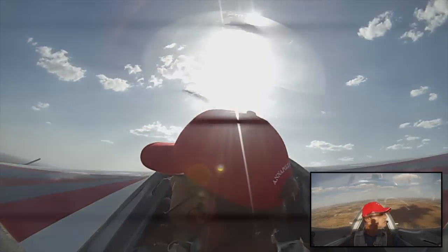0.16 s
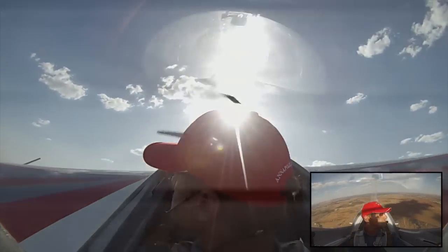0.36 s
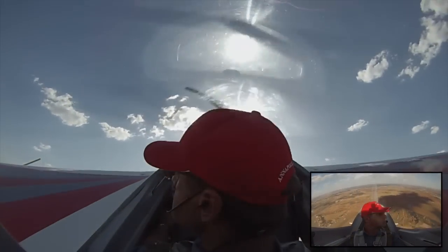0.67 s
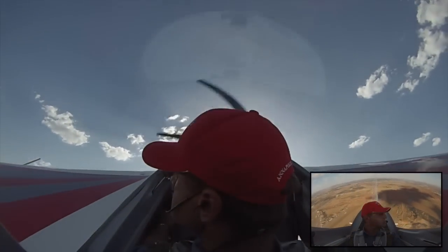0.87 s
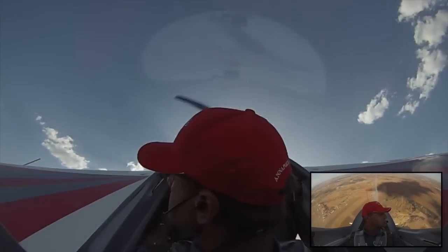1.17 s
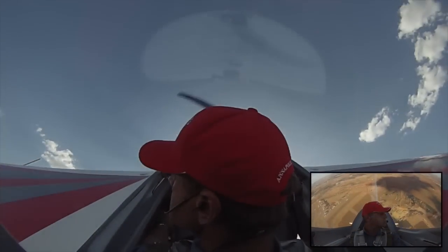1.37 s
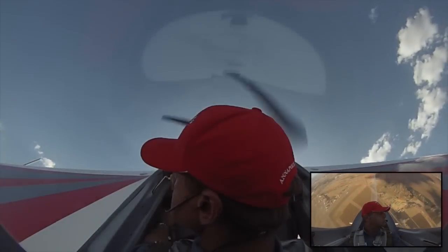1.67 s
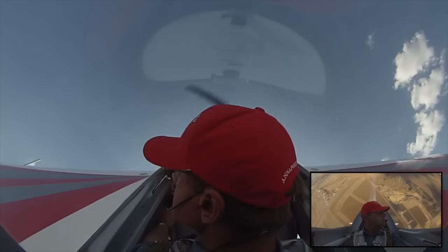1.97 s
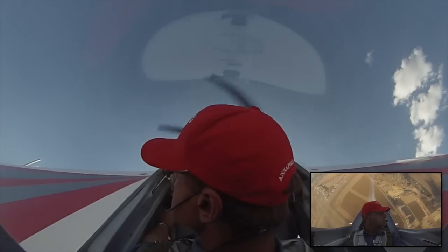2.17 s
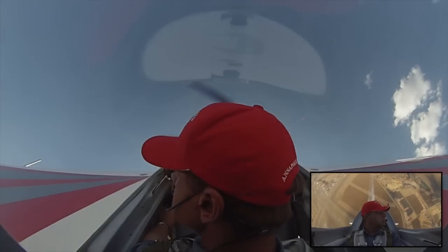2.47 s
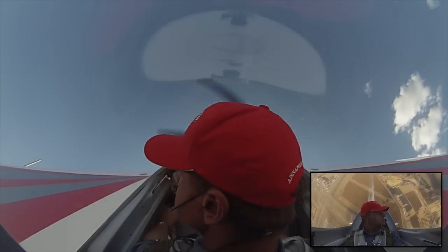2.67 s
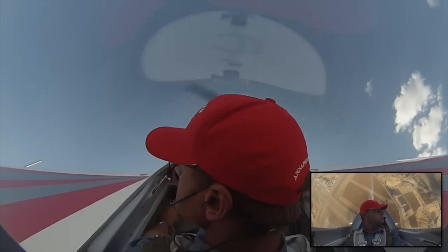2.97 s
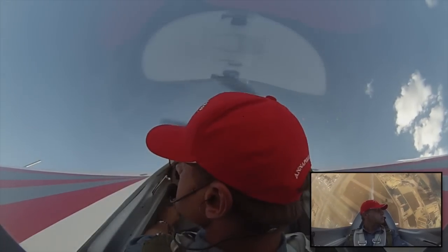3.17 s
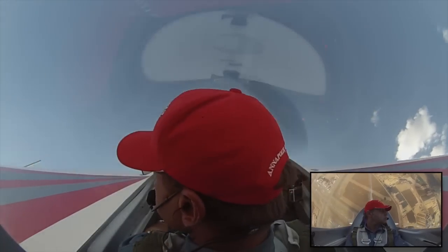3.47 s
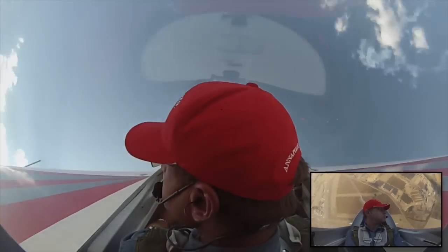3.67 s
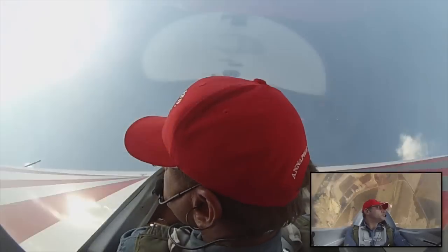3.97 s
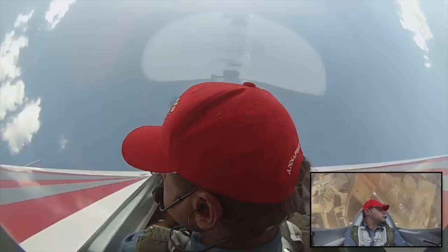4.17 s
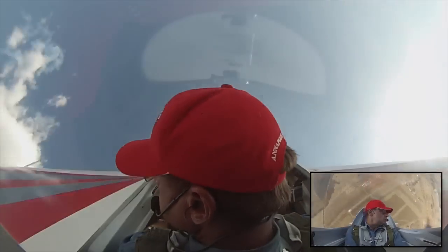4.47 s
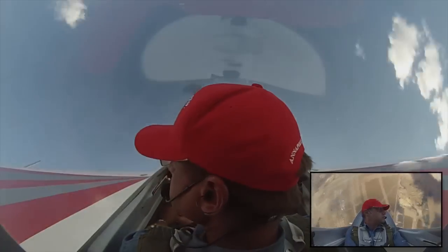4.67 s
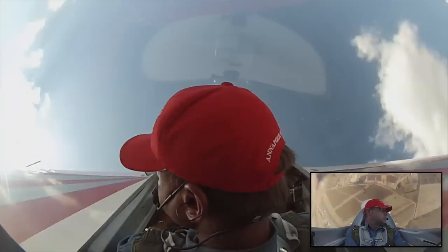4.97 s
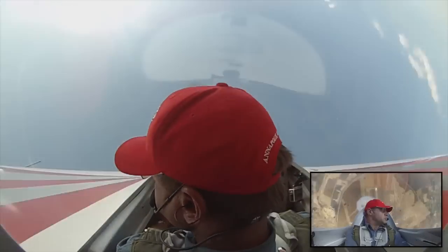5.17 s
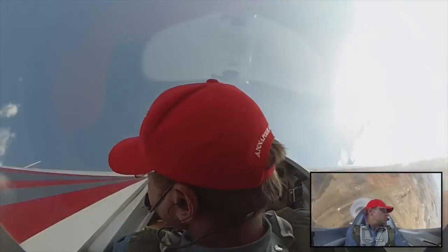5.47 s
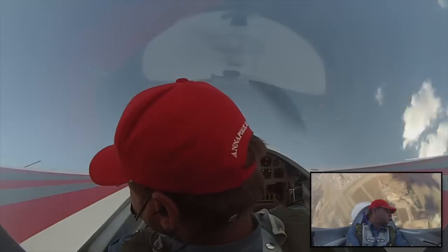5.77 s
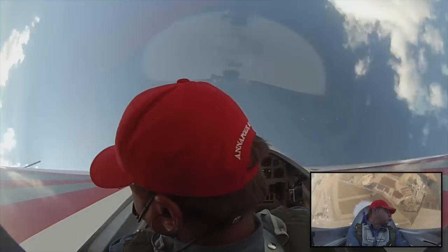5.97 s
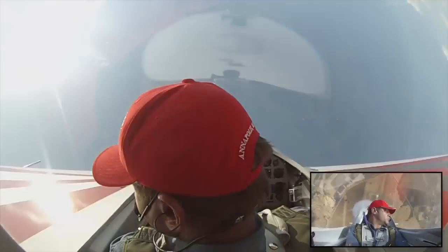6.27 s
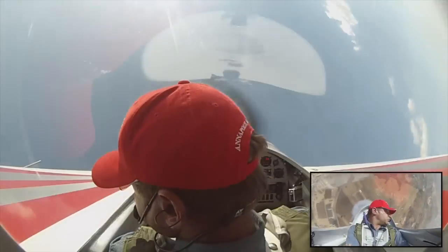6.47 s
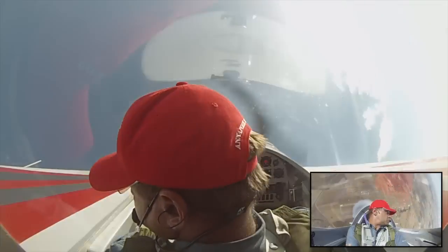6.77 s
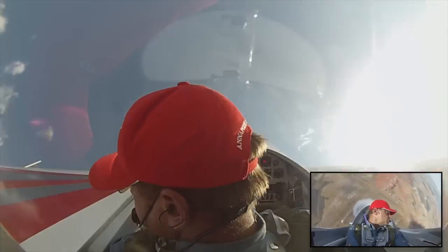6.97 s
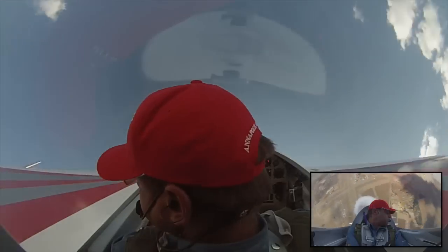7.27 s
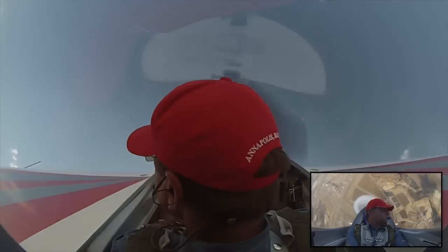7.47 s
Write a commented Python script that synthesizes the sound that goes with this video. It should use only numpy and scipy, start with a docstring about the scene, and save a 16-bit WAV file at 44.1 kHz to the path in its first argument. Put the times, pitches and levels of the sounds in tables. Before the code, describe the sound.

A small piston aircraft's engine and propeller drone steadily inside the cockpit, with low cabin boom, rushing slipstream, abrupt flickering dips and a faint buzzing rattle.

```python
"""Inside the cockpit of a small six-cylinder aircraft with a three-blade propeller, climbing and rolling.
Engine orders hum through the airframe as tones plus a slowly changing pressure pattern read once a cycle.
Slipstream over the canopy and the booming cabin air are coloured noise; a loose part buzzes and knocks
as noise bursts and single blows ringing resonances. Short dips interrupt all but the knocks.
The microphone sits in a closed housing that dulls the treble."""
import sys
import numpy as np
from scipy import signal
from scipy.fft import rfft, irfft, next_fast_len
from scipy.io import wavfile
from scipy.ndimage import map_coordinates

SR = 44100
rng = np.random.default_rng(int(sys.argv[2]) if len(sys.argv) > 2 else 0)


def wrap_up_sound(samples):
    """Save the sound to the file named by the first command line argument, as 16-bit audio."""
    columns = np.atleast_2d(samples).T
    # keep every value between -1 and 1, then stretch to whole-number steps
    tamed = np.clip(columns, -1, 1)
    steps = np.round(tamed * 32767).astype(np.int16)
    wavfile.write(sys.argv[1], SR, steps)


N = 335601

# Level of slipstream, engine, boom and buzz together, gusting as the aircraft turns; their own
# levels are relative to it (start_s, level_db)
STREAM_LEVEL = [(0, -26), (.24, -23), (.62, -25.5), (1.2, -25), (2.2, -25), (2.85, -24.5), (3.3, -26),
                (4.0, -27.5), (4.8, -25), (5.6, -27), (5.69, -25), (6.3, -28.5), (6.6, -27), (7.0, -29.5),
                (7.5, -28.5), (7.61, -27.5)]
# Abrupt drops of that same mix, each creeping back (start_s, depth_db, recovery_time_constant_s)
DIPS = [(.11, 3, 0.077), (.268, 2.5, .1), (1.023, 3, .12), (1.25, 3.5, .08), (1.278, 5.5, 0.078),
        (1.616, 3.5, 0.074), (1.775, 5.5, 0.04), (1.896, 3.5, 0.21), (2.05, 6, 0.092), (2.225, 4, .13),
        (2.335, 4.5, .1), (2.498, 5.5, 0.11), (2.619, 6, 0.084), (2.79, 3.5, 0.19), (3.098, 3.5, 0.15),
        (3.546, 4, 0.17), (3.672, 2, .06), (4.069, 1, 0.045), (4.212, 8, .17), (4.52, 2, .06),
        (4.63, 5, 0.097), (4.858, 6, 0.11), (5.103, 9, .12), (5.387, 5.5, .12), (5.506, 3.5, 0.098),
        (5.712, 4, 0.12), (5.912, 2.5, 0.21), (5.981, 3.5, 0.11), (6.166, 2, .1), (6.41, 1.5, 0.14),
        (6.66, 1.5, 0.13), (6.82, 4.5, 0.12), (6.965, 4, .13), (7.109, 2, .1), (7.2, 3, 0.11),
        (7.532, 3, .1)]
DROP_S = .004  # time constant of the fall

# Colour of the cabin boom (frequency_hz, density_db)
BOOM_COLOUR = [(15, -60.5), (30, -25), (45, -19.5), (60, -2.5), (80, 3.5), (100, -6), (120, -6.5),
               (150, -29), (250, -120)]
# Level of the cabin boom (start_s, level_db)
BOOM_LEVEL = [(0, 4), (1.5, 6.5), (2.1, 14.5), (3.4, 3), (4.2, 11), (4.7, 9), (5.3, 13), (5.8, 10.5),
              (7.2, 13.5), (7.6, 12.5)]

# Colour of the slipstream through canopy and housing, also of the engine pattern (frequency_hz, density_db)
CANOPY_COLOUR = [(220, -44.5), (380, -9), (397, -9), (497, 1.5), (593, -7.5), (672, -5), (775, -6),
                 (894, -18.5), (1050, -9), (1320, -7.5), (1730, -17), (2380, -10), (2490, -10),
                 (2700, -38.5), (3200, -46.5), (4160, -47.5), (7040, -120)]
# Colour of the low roar of the slipstream (frequency_hz, density_db)
ROAR_COLOUR = [(59, -33.5), (100, -2.5), (216, -9.5), (258, -14), (324, -11), (382, -29.5), (420, -30.5),
               (550, -57), (920, -120)]
# Colour of the slipstream hiss (frequency_hz, density_db)
HISS_COLOUR = [(1700, -40.5), (2700, 3.5), (3400, -2.5), (3750, -2.5), (3980, -5), (4150, -5),
               (5500, -11.5), (5850, -14.5), (6800, -14), (7500, -19), (9400, -28), (10500, -33),
               (11600, -31.5), (12200, -38.5), (15000, -46.5)]
# Steadily shifting level of the roar (initial_level_db, slope_db_per_s)
ROAR_LEVEL = (6.65, -0.54)
# Steadily shifting level of the hiss (initial_level_db, slope_db_per_s)
HISS_LEVEL = (-18.5, -.3)
# Short surges of air over the canopy, brighter than the steady stream (centre_s, gain_db)
GUSTS = [(.78, 2.5), (3.0, 3.5), (4.16, 2), (5.87, 2), (6.64, 1.5)]
GUST_S, GUST_HISS = .05, 1.3  # half length in s; the hiss rises this many times more in dB

# Rings of the loose part, two low and one high; each is passed twice (frequency_hz, width_hz, pass_gain_db)
RINGS = [(3790, 230, -1), (4300, 350, -2), (10500, 1600, 3.5)]
# How hard the loose part chatters (start_s, high_ring_level_db, low_rings_level_db)
CHATTER = [(0, -50.5, -46), (2, -48, -37.5), (3.1, -54, -40.5), (3.5, -40.5, -36), (4.2, -41.5, -32),
           (5.1, -45.5, -37), (5.4, -39.5, -37), (5.8, -50, -28.5), (6.0, -37.5, -25), (6.5, -40.5, -29.5),
           (6.9, -35.5, -27.5), (7.6, -42, -32.5)]
# Harder knocks of the loose part (start_s, peak_db)
KNOCKS = [(5.7453, -31), (6.2382, -38.5), (6.2941, -36)]

# The governor hunts a little around its setting (start_s, engine_cycle_hz)
SPEED = [(0, 21.05), (.7, 20.91), (2.0, 20.87), (2.8, 21.03), (3.4, 21.07), (3.85, 21.41), (4.4, 20.99),
         (4.9, 21.03), (5.45, 20.86), (6.0, 21.11), (7.61, 21.19)]
# Strongest hum tones, 6 being firings and blade passes (multiple_of_cycle)
MOVING = [3, 4, 6, 12]
# They wax and wane as the aircraft rolls
# (start_s, multiple_3_level_db, multiple_4_level_db, multiple_6_level_db, multiple_12_level_db)
HUM = [(0, 2.5, -7, 6.5, 5.5), (.4, 2.5, 1, -4.5, 0), (.9, 1.5, -8, -10, -4), (1.2, 9, -8, 4, -1.5),
       (2.1, -3.5, 9.5, 6.5, 3), (2.5, 0, -4, 3.5, 0.5), (2.8, 4, -2, 3.5, 5.5), (3.3, 2, 2, 8, 7),
       (3.6, 5, 0, 13, 3), (3.9, 4, 8.5, 7.5, 0), (4.2, 2, 4, 8.5, 3), (4.5, 9.5, 5, -1, -2),
       (4.8, 7.5, 3, 7, 6), (5.4, 6, 13, 9, 3), (5.8, -7.5, 2.5, 13, 1.5), (6.08, -6, -3.5, 17, -5),
       (6.3, 10, 4, 13, 5), (6.6, 0, 5, 8, 4), (6.9, -5, 13, 17, 5), (7.2, -13, 18, 9.5, -1),
       (7.61, 5.5, 13.5, 9.5, 1)]
# Steadier hum tones (multiple_of_cycle)
STEADY = [2, 5, 8, 10, 14, 15, 16, 22, 24, 31, 63]
# Their centre levels at the start (initial_level_db)
STEADY_DB = [-8, -9, -8, -11.5, -17, -9, -14, -18.5, -24.5, -23, -17.5]
# Airspeed bleeds off in the climb, so their balance shifts steadily (slope_db_per_s)
STEADY_DB_PER_S = [0.66, 0.44, 0.22, 0.12, 0.7, -0.02, 0.2, 0.71, 2.7, 1.6, 0.5]
# Multiple 9 of the cycle fades out as the climb steepens (start_s, centre_level_db)
NINTH = [(0, -9), (.4, -0.5), (1.5, 2), (2.8, 1), (3.5, -10.5), (7.61, -14)]
# Pressure pattern of the cycle, shifting likewise as airspeed falls (initial_level_db, slope_db_per_s)
PATTERN_LEVEL = (-10, 1.1)

TOP_HZ = 14900  # band limit of the microphone chain


def amp(db):
    """Gain of a level in dB."""
    return 10 ** (np.asarray(db) / 20)


def unit(x):
    """x at rms 1."""
    return x / np.sqrt(np.mean(x ** 2) + 1e-20)


def curves(rows):
    """One value per sample for each column after the time."""
    s, *columns = np.transpose(rows)
    return [np.interp(np.arange(N) / SR, s, column) for column in columns]


def drifting(level):
    """A level in dB that changes at a steady rate."""
    return level[0] + level[1] * np.arange(N) / SR


def wobble(rate):
    """A smooth random curve through rate knots a second."""
    grid = np.arange(0, N + 16, 16)
    knots = rng.standard_normal(int(N * rate / SR) + 4)
    return np.interp(np.arange(N), grid, map_coordinates(knots, [grid * rate / SR]))


def filtered(x, response):
    """x times a response of frequency."""
    m = next_fast_len(N + 8192)
    return irfft(rfft(x, m) * response(np.fft.rfftfreq(m, 1 / SR)), m)[..., :N]


def coloured(x, spectrum):
    """x at rms 1 in the colour of (frequency_hz, density_db) points."""
    f, db = np.transpose(spectrum)
    return unit(filtered(x, lambda hz: amp(np.interp(np.log(hz + 1), np.log(f + 1), db))))


def rush(spectrum, swing_db):
    """Rushing air: noise whose level swings before it takes its colour."""
    return coloured(amp(swing_db) * rng.standard_normal(N), spectrum)


def ringing(x, modes):
    """x passed twice through a bank of damped resonances."""
    def response(f):
        bank = sum(amp(db) * 1j * f * width / (centre ** 2 - f ** 2 + 1j * f * width)
                   for centre, width, db in modes)
        return bank ** 2
    return filtered(x, response)


def dips():
    """Level in dB: every dip falls within milliseconds and dies away exponentially."""
    s, depth_db, recovery_s = np.transpose(DIPS)[..., None]
    grid = np.arange(0, N + 64, 64)
    late = np.maximum(grid / SR - s, 0)
    drop = depth_db * (1 - np.exp(-late / DROP_S)) * np.exp(-late / recovery_s)
    return np.interp(np.arange(N), grid, -np.sum(drop, axis=0))


def cabin_boom():
    """The cabin air booms: low noise with a moving level."""
    return amp(curves(BOOM_LEVEL)[0]) * rush(BOOM_COLOUR, swing_db=0)


def slipstream(cycle):
    """Turbulent air in three ranges, pulsed by the engine and swelling in surges."""
    # uneven cylinders: once a cycle, once a turn, every second firing and every firing
    throb = 0.53 * np.sin(cycle) + 0.64 * np.sin(2 * cycle + 0.92)
    throb += .45 * np.sin(3 * cycle) + 0.59 * np.sin(6 * cycle)
    gust = wobble(30)
    t = np.arange(N) / SR
    surge_db = sum(db * np.exp(-((t - s) / GUST_S) ** 2) for s, db in GUSTS)
    stream = amp(surge_db) * rush(CANOPY_COLOUR, swing_db=0.81 * throb + 1.2 * gust)
    roar = amp(drifting(ROAR_LEVEL)) * rush(ROAR_COLOUR, swing_db=0.6 * throb + 0.28 * gust)
    hiss_swing_db = 0.89 * throb + 0.78 * gust + 0.9 * wobble(300)
    hiss = amp(drifting(HISS_LEVEL) + GUST_HISS * surge_db) * rush(HISS_COLOUR, hiss_swing_db)
    return stream + roar + hiss


def knocks():
    """Harder blows of the loose part ring its two lower modes."""
    blows = np.zeros(N)
    for s, peak_db in KNOCKS:
        blows[round(s * SR)] = amp(peak_db)
    peak = np.abs(ringing(signal.unit_impulse(N), RINGS[:2])).max()
    return ringing(blows, RINGS[:2]) / peak


def buzz(cycle):
    """A loose part chatters near the firings, each time at another strength, in flurries."""
    firings = np.flatnonzero(np.diff(np.floor(6 * cycle / (2 * np.pi))))
    draw = rng.standard_normal((len(firings), 2))
    jitter = (90 * draw[:, 0]).astype(int)  # in samples, about 2 ms
    contacts = np.bincount(np.clip(firings + jitter, 0, N - 1), amp(3.5 * draw[:, 1]), N)
    # each contact scrapes for a few milliseconds
    envelope = signal.lfilter([1], [1, -np.exp(-1 / (.004 * SR))], contacts)
    flurries = amp(2 * wobble(12))
    scrape = envelope * flurries * rng.standard_normal(N)
    high_db, low_db = curves(CHATTER)
    high = amp(high_db) * unit(ringing(scrape, RINGS[2:]))
    low = amp(low_db) * unit(ringing(scrape, RINGS[:2]))
    return high + low


def engine_tone(cycle, multiple, drift):
    """One multiple of the cycle at rms 1; its phase drifts (rad) as the airframe flexes."""
    phase = rng.uniform(0, 2 * np.pi) + drift * wobble(4)
    return np.sqrt(2) * np.sin(multiple * cycle + phase)


def engine_pattern(cycle):
    """A random pressure pattern repeats every cycle and slowly turns into another."""
    per_s, points = 1.5, 192  # new patterns a second, points in each
    patterns = rng.standard_normal((int(N / SR * per_s) + 2, points))
    where = [np.arange(N) / SR * per_s, cycle / (2 * np.pi) % 1 * points]
    pressure = map_coordinates(patterns, where, mode="grid-wrap")
    return amp(drifting(PATTERN_LEVEL)) * coloured(pressure, CANOPY_COLOUR)


def engine(cycle):
    """Firings and blade passes hum through the airframe as multiples of the engine cycle."""
    hum = engine_pattern(cycle)
    for k, db in zip(MOVING, curves(HUM)):
        hum += amp(db) * engine_tone(cycle, k, drift=0.14)
    for k, *level in zip(STEADY, STEADY_DB, STEADY_DB_PER_S):
        hum += amp(drifting(level) + 2.0 * wobble(3)) * engine_tone(cycle, k, drift=0.39)
    ninth_db = curves(NINTH)[0] + 2 * wobble(3)
    return hum + amp(ninth_db) * engine_tone(cycle, 9, drift=0.6)


def scene():
    """Everything reaches one microphone; the knocks keep their own level."""
    cycle = 2 * np.pi * np.cumsum(curves(SPEED)[0]) / SR  # engine phase in rad
    drone = cabin_boom() + slipstream(cycle) + buzz(cycle) + engine(cycle)
    return amp(curves(STREAM_LEVEL)[0] + dips()) * drone + knocks()


def record(dry):
    """The input stage flattens the highest peaks; nothing passes above the band limit."""
    soft = dry / (1 + np.abs(dry / .8) ** 8) ** (1 / 8)
    return filtered(soft, lambda hz: hz < TOP_HZ)


dry = scene()
out = record(dry)
wrap_up_sound(out)
```